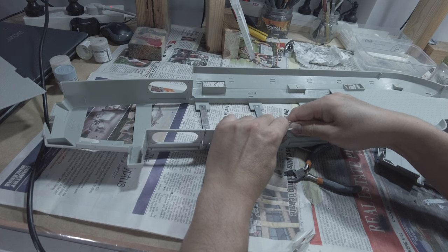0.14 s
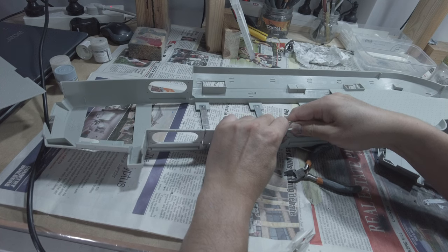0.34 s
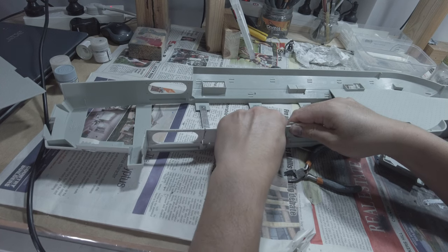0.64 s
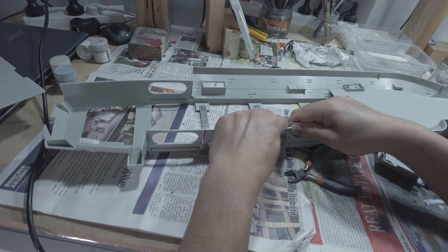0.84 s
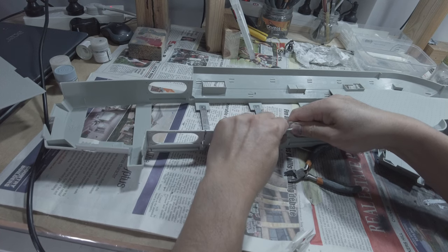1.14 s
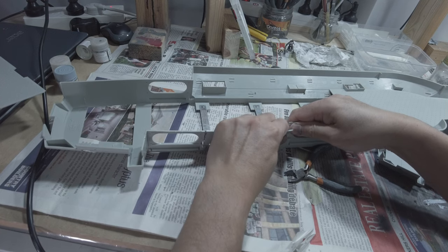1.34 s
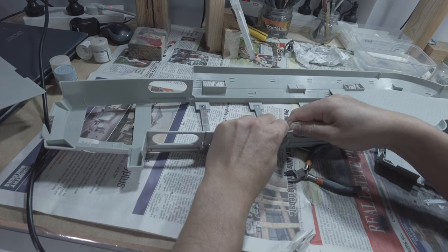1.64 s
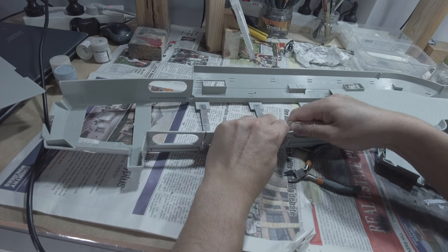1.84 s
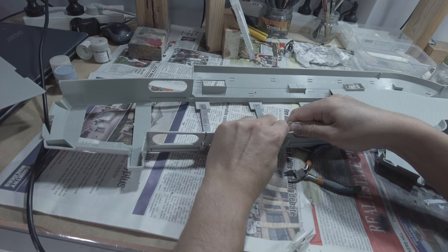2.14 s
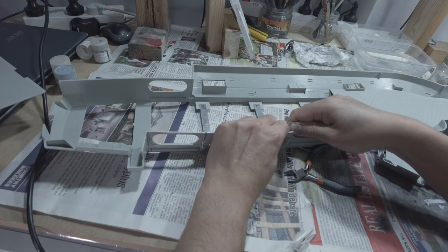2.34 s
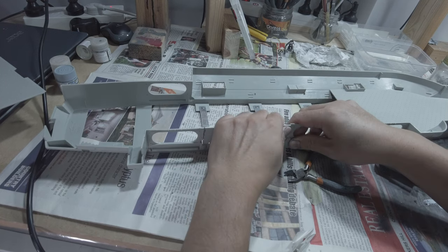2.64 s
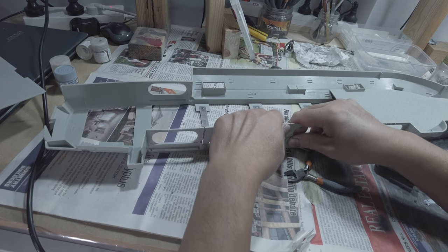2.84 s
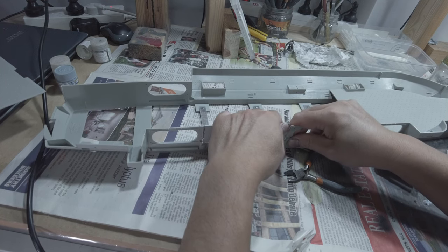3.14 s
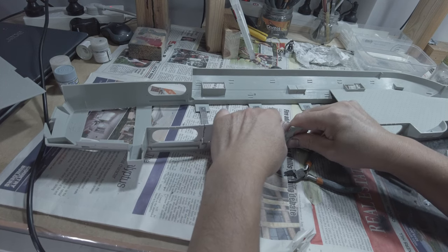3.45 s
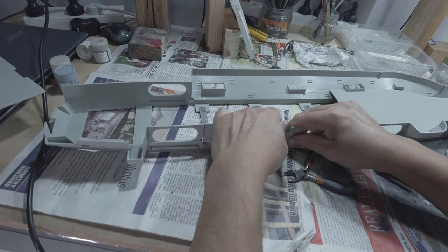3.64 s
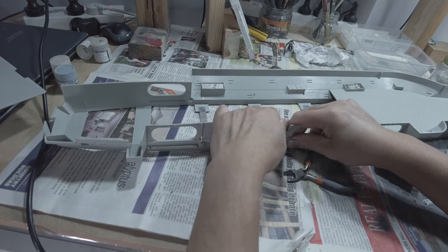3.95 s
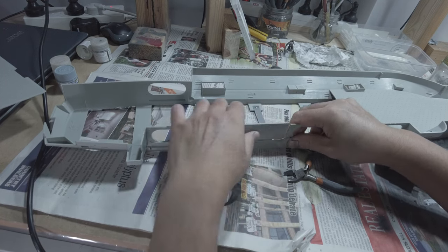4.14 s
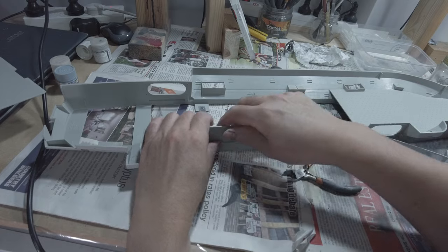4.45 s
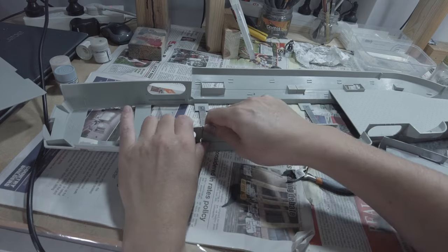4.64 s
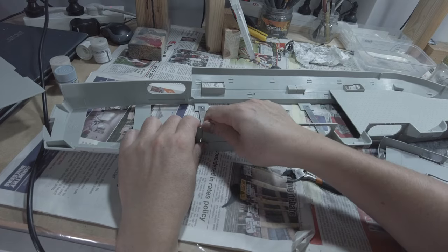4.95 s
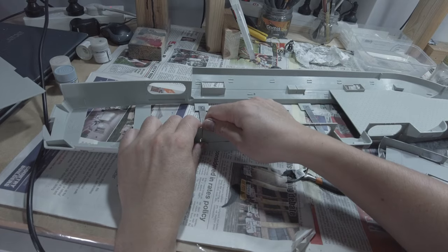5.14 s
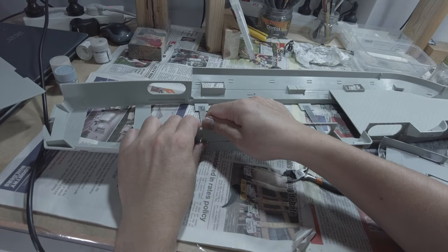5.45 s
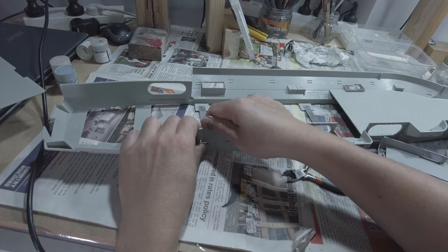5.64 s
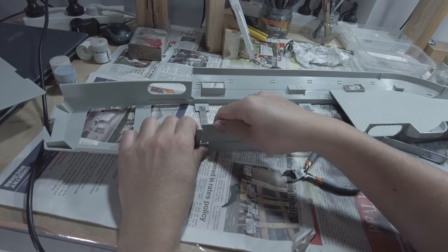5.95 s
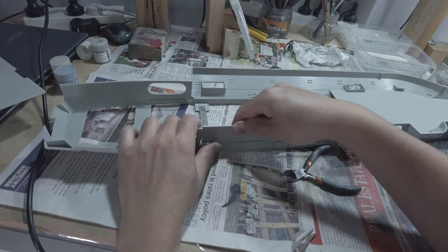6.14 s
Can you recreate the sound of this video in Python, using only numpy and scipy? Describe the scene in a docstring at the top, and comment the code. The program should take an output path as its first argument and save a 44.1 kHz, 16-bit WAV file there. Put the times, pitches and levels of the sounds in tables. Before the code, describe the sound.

Hard plastic parts knock, click and rattle in a hollow shell while hands rub dryly over paper, above a steady low fan hum.

```python
"""A fan hums and rushes throughout in a small room: tones, narrow-band noise and broadband noise.
From 0.4 s hands press plastic kit parts into a long hollow hull that lies on newsprint on a workbench.
Skin and parts slide with a dry hiss (shaped noise), sharp clicks tick and snap (short bursts), and parts
knock: damped sines and noise, after each of which the hull rattles on. The strongest blows fall near
0.9, 3.8 and 5.5 s; the room adds decaying echoes. Two close microphone ports listen from above."""
import sys
import numpy as np
from scipy import signal
from scipy.fft import rfft, irfft
from scipy.io import wavfile
from scipy.ndimage import uniform_filter1d

SR = 44100
rng = np.random.default_rng(int(sys.argv[2]) if len(sys.argv) > 2 else 0)


def pcm_store(signal):
    """Save signal as 16-bit PCM."""
    levels = np.round(np.clip(np.atleast_2d(signal), -1, 1) * 32767)
    wavfile.write(sys.argv[1], SR, levels.astype(np.int16).T)


N = 277389


def amp(db):
    """Decibel law: a level in dB becomes an amplitude ratio."""
    return 10 ** (np.asarray(db) / 20)


def evened(x):
    """Power normalization: scales a signal to rms 1."""
    return x / np.sqrt(np.mean(x ** 2) + 1e-20)


def read(points, hz):
    """Spectral interpolation: reads a table along a logarithmic frequency axis."""
    f, value = np.transpose(points)
    return np.interp(np.log(hz + 1), np.log(f + 1), value)


def left_right(db):
    """Level-difference stereo: gains of left and right that lie db apart."""
    return amp([[db / 2], [-db / 2]])


def add(mix, s, sound, pan_db):
    """Superposition: adds a sound at time s, with a level difference between left and right."""
    part = mix[:, round(s * SR):][:, :sound.shape[-1]]
    part += (sound * left_right(pan_db))[:, :part.shape[1]]


def band(x, lo_hz, hi_hz):
    """Band-pass filtering: a causal Butterworth filter keeps one range of frequencies."""
    edges_hz = [lo_hz, min(hi_hz, SR / 2.1)]
    return signal.sosfilt(signal.butter(2, edges_hz, "band", fs=SR, output="sos"), x)


def pair(length, same):
    """Partial coherence: two white noises with the given correlation."""
    a, b = rng.standard_normal((2, length))
    same = np.clip(same, 0, 1)
    return np.array([a, same * a + np.sqrt(1 - same ** 2) * b])


def hiss(gain, same):
    """Spectral shaping: random short-time spectra with a gain and left-right coherence for each bin."""
    size = 2 * (len(gain) - 1)
    a, b, c, d = rng.standard_normal((4 * N // size + 5, len(gain), 4)).T
    same = np.clip(same, -1, 1)[:, None]
    left = a + 1j * b
    right = same * left + np.sqrt(1 - same ** 2) * (c + 1j * d)
    z = np.array([left, right]) * gain[:, None]
    return signal.istft(z, nperseg=size, noverlap=3 * size // 4)[1][:, :N]


def resonate(x, hz, width_hz):
    """Heterodyne resonance: shift the centre hz down to zero, smooth twice, shift back."""
    turn = np.exp(2j * np.pi * np.cumsum(hz) / SR)
    r = np.exp(-np.pi * width_hz / SR)
    smooth = signal.lfilter([1 - r], [1, -r], x / turn)
    smooth = signal.lfilter([1 - r], [1, -r], smooth)
    return 2 * (turn * smooth).real


# Spectrum shape of the steady rush: (frequency [Hz], relative density [dB per Hz])
AIR_SPECTRUM = [(4.7, -29), (8.0, -8), (37, 2), (54, -29), (105, -15), (127, -19), (198, -19.5),
                (232, -26.5), (281, -23.5), (351, -23.5), (399, -22.5), (684, -38), (777, -41), (1510, -40),
                (15900, -61.5)]
# Coherence of the rush between the ports: (frequency [Hz], left-right likeness [0 to 1])
AIR_COHERENCE = [(30, 1), (100, 0.95), (200, 0.78), (400, 0.37), (800, 0.2), (1650, 0.22), (5000, 0.61),
                 (15000, 0.14)]
# Stereo balance of rush and fan tones: (frequency [Hz], left over right [dB])
TILT = [(60, -2.5), (180, -0.5), (550, 1.5), (1650, 1), (4970, -0.5), (15000, -1)]
AIR_DB = -49.5  # rms before the stereo tilt


def air():
    """Broadband flow noise: the steady rush of the fan and the room, partly coherent between the ports."""
    hz = np.fft.rfftfreq(4096, 1 / SR)
    rush = evened(hiss(amp(read(AIR_SPECTRUM, hz)), read(AIR_COHERENCE, hz)))
    tilt_db = read(TILT, np.fft.rfftfreq(N, 1 / SR)) / 2
    return amp(AIR_DB) * irfft(rfft(rush) * amp([tilt_db, -tilt_db]), N)


# Steady blade and motor tones: (frequency [Hz], level before stereo tilt [dB rms])
FAN_TONES = [(32.3, -51), (97.8, -66), (293.6, -67.5)]
# Wavering lines and casing resonances:
# (centre frequency [Hz], level before stereo tilt [dB rms], width at half amplitude [Hz])
FAN_BANDS = [(22, -53, 3.3), (56.63, -55, 6.8), (98.64, -65.5, 2.1), (159.5, -69.5, 4.7), (199.8, -67.5, 2),
             (393.4, -71, 6.2), (448.7, -72.5, 1.7), (484, -73, 0.91), (764, -77, 120), (1415, -76.5, 290),
             (3190, -84.5, 400)]


def fan():
    """Periodic excitation and resonance: steady sines, with noise narrowed to wavering lines and bands."""
    hz, t = np.fft.rfftfreq(N, 1 / SR), np.arange(N) / SR
    out = np.zeros((2, N))
    for f, db in FAN_TONES:
        tone = np.sqrt(2) * np.sin(2 * np.pi * (f * t + rng.random()))
        out += amp(db) * tone * left_right(read(TILT, f))
    for f, db, width in FAN_BANDS:
        spectrum = rfft(rng.standard_normal(N)) / (1 + (2 * (hz - f) / width) ** 2)
        out += amp(db) * evened(irfft(spectrum, N)) * left_right(read(TILT, f))
    return out


# Short rubs of skin on paper and plastic: (start [s], peak [s], end [s], peak hiss level [dB]);
# the one row whose end (5.5 s) is set before its start (5.65 s) stays silent
RUBS = [(0.43, 0.494, 0.95, -67.5), (0.535, 0.597, 0.68, -63), (1.22, 1.288, 1.42, -73),
        (2.49, 2.6, 2.88, -63), (2.84, 2.875, 3.3, -73.5), (3.2, 3.216, 3.5, -72),
        (3.997, 4.11, 4.23, -60.5), (4.9, 4.952, 5.14, -64), (4.98, 5.048, 5.5, -71.5),
        (5.14, 5.24, 5.4, -74.5), (5.338, 5.393, 5.42, -68), (5.55, 5.577, 5.8, -59),
        (5.65, 5.69, 5.5, -58), (5.75, 5.786, 6.2, -64.5), (6.002, 6.107, 6.23, -59.5),
        (6.094, 6.193, 6.43, -57.5)]
# The forearm slides over the paper: (time [s], hiss level [dB])
SLIDE = [(4.26, -85), (4.29, -63.5), (4.32, -65), (4.35, -64.5), (4.39, -59), (4.47, -56.5), (4.6, -54.5),
         (4.68, -57), (4.815, -67), (4.845, -66), (4.93, -70.5)]
RUB_FADE_DB = 26  # a rub's ends lie this far under its peak


def rubbing(t):
    """Addition of powers: the gain of all skin contact, with rubs that swell and fade and one long slide."""
    s, db = np.transpose(SLIDE)
    power = amp(np.interp(t, s, db, -200, -200)) ** 2
    for start, peak, end, db in RUBS:
        curve_db = [db - RUB_FADE_DB, db, db - RUB_FADE_DB]
        power += amp(np.interp(t, [start, peak, end], curve_db, -200, -200)) ** 2
    return np.sqrt(uniform_filter1d(power, size=200).clip(0))


# Spectrum shape of skin on paper: (frequency [Hz], relative density [dB per Hz])
SKIN_SPECTRUM = [(3000, -6), (5500, -1.5), (8000, -3.5), (13000, -7), (15700, -5.5), (16000, -25.5)]


def skin_on_paper():
    """Friction noise: a shaped hiss, made slightly grainy by random modulation."""
    hz = np.fft.rfftfreq(256, 1 / SR)
    skin = evened(hiss(amp(read(SKIN_SPECTRUM, hz)), np.full(len(hz), 0.5)))
    return skin * evened(amp(1.8 * evened(uniform_filter1d(rng.standard_normal(N), 130))))


# Vibration modes of the shell: (frequency [Hz], relative initial level [dB], 60 dB decay time [s])
HULL_MODES = [(600, -11.5, 0.019), (690, -8.5, 0.03), (885, 3, 0.0093), (1360, -10.5, 0.045),
              (1690, 11, 0.0052), (2185, -7, 0.0047), (2890, 0.5, 0.0055), (3600, 4.5, 0.0018),
              (4480, -4, 0.0077), (4900, -5, 0.0038), (5740, -9, 0.0063), (6340, -3.5, 0.0044)]


def hull(x, plain_db=-3):
    """Modal superposition: the shell's modes ring on top of the plain sound."""
    t = np.arange(4096) / SR
    ring = sum(amp(db - 60 * t / t60) * np.sin(2 * np.pi * hz * t) for hz, db, t60 in HULL_MODES)
    ring /= np.linalg.norm(ring)
    ring[0] = amp(plain_db)  # the plain sound, relative to the whole ring
    return signal.oaconvolve(x, ring[None] / np.linalg.norm(ring), axes=1)[:, :N]


# Loose parts shake and scrape against the shell, swelling fast and dying away:
# (peak time [s], rise [s], 60 dB decay time [s], scrape in the hull [dB], its centre frequency [Hz],
# scrape at the thin edges [dB])
SHAKES = [(.508, 0.038, 0.14, -53.5, 1110, -63), (.596, 0.079, 0.26, -63, 854, -66),
          (.854, 0.026, 0.13, -33.5, 760, -42), (.91, .04, 0.092, -59, 875, -56),
          (.985, 0.044, 0.15, -59, 1130, -59), (1.08, 0.047, .11, -59.5, 894, -61),
          (1.79, 0.022, .02, -51, 800, -80), (1.8, .006, 0.14, -40, 990, -61),
          (1.88, 0.037, 0.073, -63, 1070, -74), (2.5, .01, 0.31, -61, 910, -66),
          (2.56, .01, 0.067, -62, 1235, -71), (2.592, .015, 0.06, -50.5, 960, -62),
          (2.648, 0.049, 0.15, -41.5, 950, -51), (2.75, 0.023, 0.37, -64, 883, -68),
          (2.882, .03, 0.36, -65, 814, -76), (3.05, .006, 0.12, -43, 1310, -49.5),
          (3.165, 0.04, 0.091, -54.5, 820, -53.5), (3.285, .02, 0.13, -60.5, 650, -64.5),
          (3.816, 0.027, .03, -39.5, 900, -46), (3.833, .01, 0.12, -26, 1060, -28),
          (3.866, 0.021, 0.17, -41, 1020, -32.5), (3.93, 0.071, 0.1, -41.5, 1130, -60.5),
          (4.07, 0.11, .2, -59.5, 1060, -74), (4.144, 0.058, 0.13, -47, 1060, -52.5),
          (4.32, 0.093, 0.11, -57.5, 1224, -66), (4.438, 0.11, 0.084, -51.5, 754, -70),
          (4.65, 0.073, 0.17, -48.5, 1260, -64), (4.845, .02, 0.34, -60, 1180, -67.5),
          (5.527, 0.026, 0.088, -45.5, 820, -62), (5.542, 0.013, 0.032, -36, 900, -44),
          (5.56, .01, 0.16, -47, 1065, -38), (5.58, 0.027, .15, -42.5, 1150, -42),
          (5.608, 0.085, 0.11, -33.5, 1390, -40.5), (5.712, 0.064, 0.13, -50, 857, -53),
          (5.785, 0.069, 0.15, -49, 970, -52), (5.822, 0.063, 0.25, -45, 1295, -50),
          (6.108, 0.046, 0.19, -56, 690, -62.5)]
SWELL_DB = 30  # a shake climbs this far during its rise
# hiss relative to the edges for an edge scrape at -50 dB; harder scrapes hiss more
SHAKE_HISS_DB, BRIGHTER_PER_DB = -12.5, 0.5


def shakes(skin, grit, edges):
    """Contact excitation: each shake shapes a body resonance, an edge scrape and a hiss."""
    out, t = np.zeros((2, N)), np.arange(N) / SR
    for peak, rise, t60, body_db, centre_hz, edges_db in SHAKES:
        near = slice(round((peak - rise) * SR), round(peak * SR) + SR // 3)
        late = t[near] - peak
        swell_db = SWELL_DB * late / max(rise, .002)
        decay_db = -60 * late / max(t60, .01)
        body = evened(resonate(grit[:, near], centre_hz + 0 * late, 760))
        hiss_db = edges_db + SHAKE_HISS_DB + BRIGHTER_PER_DB * (edges_db + 50)
        scrape = amp(body_db) * body + amp(edges_db) * edges[:, near] + amp(hiss_db) * skin[:, near]
        out[:, near] += amp(np.minimum(swell_db, decay_db)) * scrape
    return out


RUB_EDGES_DB, RUB_BODY_DB, RUB_BODY_HZ = -9.5, -13, 830  # rubbing heard in the shell, re its hiss


def sliding():
    """Friction-driven vibration: skin hisses on paper, and rubbing or shaking scrapes the shell."""
    t = np.arange(N) / SR
    skin = skin_on_paper()
    grit = pair(N, 0.17) * amp(2.6 * evened(uniform_filter1d(rng.standard_normal(N), 90)))
    edges = evened(hull(band(grit, 1670, 4700)))
    body = evened(resonate(grit, RUB_BODY_HZ + 0 * t, 940))
    rubs = rubbing(t) * (skin + amp(RUB_EDGES_DB) * edges + amp(RUB_BODY_DB) * body)
    return rubs + shakes(skin, grit, edges)


# Sharp clicks: thin ticks of small edges and nails, and at 5.546 s the hard snap of the strongest blow:
# (time [s], relative level [dB], nominal centre frequency [Hz], left over right [dB])
CLICKS = [(0.4655, -51, 5000, -2), (0.5984, -42, 5900, -2), (1.24, -50.5, 8100, -2), (1.284, -54, 12800, 6),
          (1.6136, -55, 7000, -6), (2.367, -46.5, 4100, -1), (1.874, -45, 1800, 0), (2.587, -34.5, 8000, 1),
          (2.848, -49, 9000, -2), (3.218, -53, 9000, 2), (3.4194, -57, 12000, 4), (4.4072, -32.5, 9000, 2),
          (4.826, -34, 10900, -1), (4.925, -54, 12000, -4), (5.03, -40, 18000, 2),
          (5.1044, -51.5, 11000, 4), (5.2314, -45, 21000, 3), (5.39, -44.5, 21000, 2),
          (5.5326, -24.5, 5300, 6), (5.546, -3.5, 3780, 1.5), (5.6815, -58, 7120, 1),
          (5.7632, -46, 12000, -3)]


def clicks():
    """Impulsive excitation: a sharp pulse and band-passed noise with a fast decay and a weak slower tail."""
    out, t = np.zeros((2, N)), np.arange(1024) / SR
    for s, db, hz, pan_db in CLICKS:
        snap = pair(len(t), 0.85) * (np.exp(-t / 0.0004) + 0.08 * np.exp(-t / .005))
        snap[:, 0] = -1.5  # the first contact is one sharp pulse
        snap = band(snap / np.linalg.norm(snap), hz / 2.15, hz * 1.58)
        add(out, s, amp(db) * 5.7 * snap, pan_db)
    return out


def struck_tones(t, thump_db, clack_db, hz, clack_hz):
    """Damped oscillation: a few low cycles, a thud of the bench and the struck part's own short ring."""
    thump = np.sin(2 * np.pi * hz * t) * np.exp(-t * hz / 2.55) * (1 - np.exp(-t / 0.00076))
    thud = (600 / hz) ** 3 * np.sin(2 * np.pi * 110 * t) * np.exp(-t / 0.014)  # low blows move the bench most
    clack = np.sin(2 * np.pi * clack_hz * t) * np.exp(-t / 0.0023)
    return amp(thump_db) * (0.75 * thump + 0.14 * thud) + amp(clack_db - 2.0) * clack


RATTLE_DB, RATTLE_T60_S = -11, 0.087  # rattle after every blow, re the blow's gain, before filtering


def contact_noise(t):
    """Repeated impact: a sharp noise burst, then an irregular rattle that dies exponentially."""
    burst = pair(len(t), 0.74) * t * np.exp(-t / 0.00075)
    # many small separate contacts
    chatter = evened(amp(3.2 * evened(uniform_filter1d(rng.standard_normal(len(t)), 40))))
    decay = amp(RATTLE_DB - 60 * t / RATTLE_T60_S) * (1 - np.exp(-t / 0.0026))
    rattle = pair(len(t), 0.77) * chatter * decay
    return 7.54 * burst / np.linalg.norm(burst) + rattle


# Blows on the hull, with relative levels: (time [s], thump level [dB], clack level [dB], crack level [dB],
# thump pitch [Hz], clack pitch [Hz], left over right [dB])
BLOWS = [(.503, -55, -56, -59, 720, 4100, -2), (.851, -15, -29, -42, 645, 3060, -.5),
         (0.862, -21.5, -26.5, -55, 570, 2300, -6), (.876, -21, -38, -62, 756, 2410, 5),
         (.982, -42, -49, -56, 1290, 3000, 1), (1.059, -44.5, -55, -55, 920, 2150, 0),
         (1.066, -45.5, -56, -62, 1250, 2140, 1), (1.077, -50, -56, -53, 633, 2740, -1),
         (1.365, -67, -62, -79, 570, 2120, 2), (1.794, -30, -40.5, -52, 1030, 2640, -2),
         (2.495, -57, -67, -60, 910, 3890, 4), (2.557, -46, -71, -58, 1500, 3080, 2),
         (2.629, -33, -51.5, -63, 736, 2640, 2), (2.884, -54.5, -55.5, -61, 935, 3000, 3),
         (3.043, -29, -35, -58, 1460, 2940, 1.5), (3.144, -39, -45.5, -51, 890, 3140, 1),
         (3.158, -38, -45.5, -45.5, 890, 2950, 0), (3.279, -48, -57, -52, 560, 4390, 1),
         (3.8212, -9.5, -12, -15.5, 870, 6530, -0.5), (3.828, -30, -16.5, -25.5, 870, 4150, 1.5),
         (3.8545, -25, -15.5, -15, 1340, 5590, 2.5), (3.862, -32, -19.5, -28.5, 696, 6180, 3),
         (3.885, -31.5, -32.5, -34, 1280, 4340, -0.5), (4.141, -31.5, -54, -64, 1020, 2300, 1),
         (4.321, -42.5, -57, -64, 1320, 3120, -1), (4.843, -48, -46.5, -60, 1200, 3050, 3),
         (4.946, -50, -49, -51, 1750, 4210, -2), (5.5434, -12.5, -16.5, -15, 840, 4170, 0.5),
         (5.557, -25, -20, -38, 1220, 3940, -2), (5.787, -45, -42.5, -44, 942, 3200, 0),
         (5.811, -31.5, -56, -59, 1410, 2300, 5), (6.063, -57, -49, -68, 552, 3000, -1),
         (6.244, -48.5, -49, -70, 1250, 2730, 0)]


def blows():
    """Impact response: each blow gives damped tones and a sharp crack, and sets the shell ringing."""
    out, shaken, t = np.zeros((2, N)), np.zeros((2, N)), np.arange(SR // 4) / SR
    for s, thump_db, clack_db, crack_db, hz, clack_hz, pan_db in BLOWS:
        add(out, s, struck_tones(t, thump_db, clack_db, hz, clack_hz)[None], pan_db)
        noise = contact_noise(t)
        low = amp(thump_db) * band(noise, hz / 3.25, hz * 2.61)
        middle = amp(clack_db + 4.0) * band(noise, 2000, 4400)
        add(shaken, s, low + middle, pan_db)
        add(out, s, amp(crack_db) * band(noise, 4800, 13500), pan_db)
    return out + hull(shaken)


# Reverberation of the small room: (frequency [Hz], 60 dB decay time [s])
ROOM_DECAY = [(250, 0.22), (1000, 0.21), (4000, .2), (12000, 0.1)]


def room(x):
    """Reverberation: sparse taps of random sign, partly shared by the ports, decay by frequency."""
    taps = np.zeros((2, SR // 2))
    at = np.arange(130, SR // 2 - 20, 20) + rng.integers(0, 20, (2, (SR // 2 - 131) // 20))
    np.put_along_axis(taps, at, rng.choice([-1., 1.], at.shape), 1)
    taps[1] = 0.33 * taps[0] + 0.81 * taps[1]
    hz, t, z = signal.stft(taps, SR, nperseg=256)
    decay = amp(-60 * t / read(ROOM_DECAY, hz)[:, None])
    tail = signal.istft(z * decay, SR, nperseg=256)[1]
    return signal.fftconvolve(x.mean(0)[None], tail / np.linalg.norm(tail[0]), axes=1)[:, :N]


# Phase difference for sound from the bench: (frequency [Hz], lead of the left port [rad])
PORT_LEAD = [(300, 0.68), (2000, -0.16), (5000, -0.66), (9000, -1.6), (13000, -1.6), (16000, -0.5)]
ROOM_DB = -9  # gain of the echo


def scene():
    """Path difference: hands reach the two ports by unequal paths; their echo, the air and the fan add."""
    hands = blows() + clicks() + sliding()
    lead = read(PORT_LEAD, np.fft.rfftfreq(N, 1 / SR)) / 2
    direct = irfft(rfft(hands) * np.exp(1j * np.array([lead, -lead])), N)
    return direct + amp(ROOM_DB) * room(hands) + air() + fan()


EDGE_HZ = 16000


def record(dry):
    """Band limitation: a linear-phase low-pass removes the highest treble."""
    lowpass = signal.firwin(511, EDGE_HZ, window=("kaiser", 9), fs=SR)
    return signal.oaconvolve(dry, lowpass[None], "same")


dry = scene()
out = record(dry)
pcm_store(out)
```